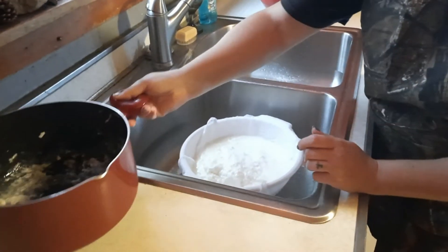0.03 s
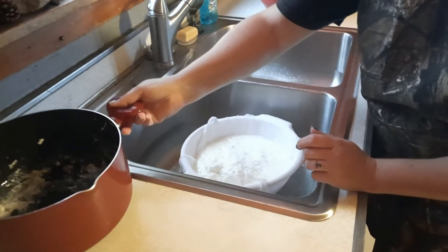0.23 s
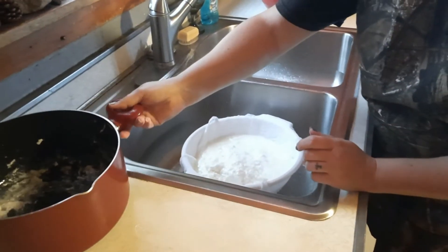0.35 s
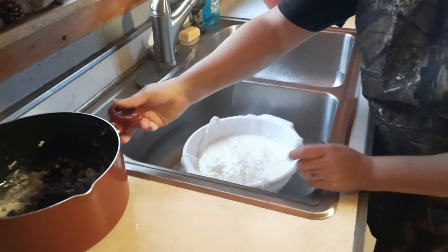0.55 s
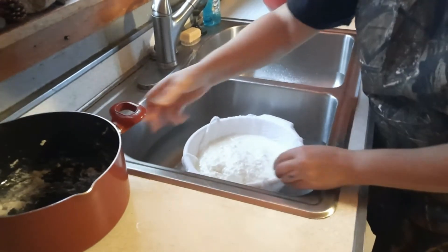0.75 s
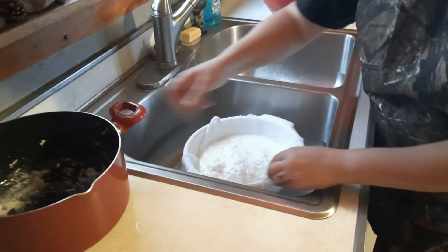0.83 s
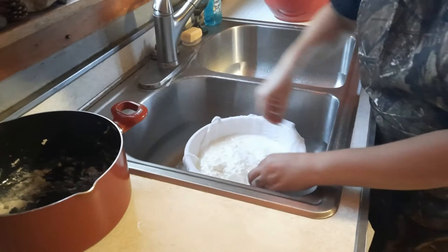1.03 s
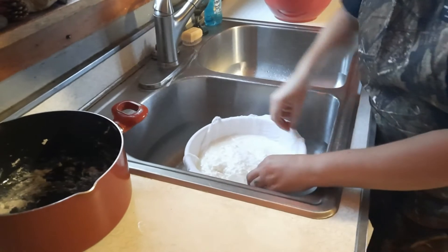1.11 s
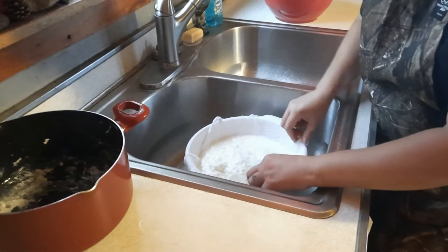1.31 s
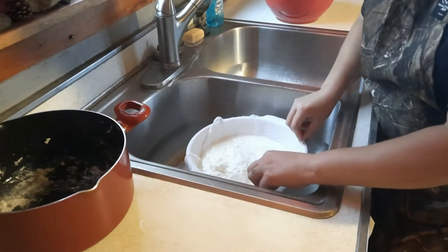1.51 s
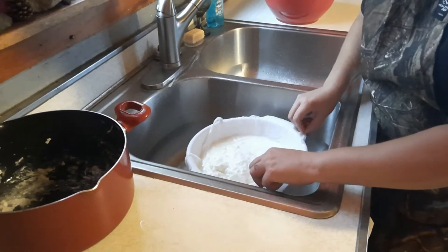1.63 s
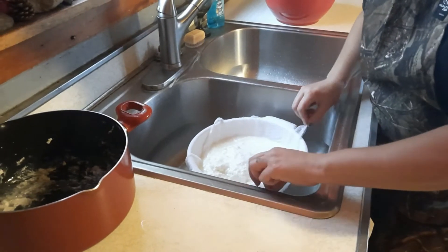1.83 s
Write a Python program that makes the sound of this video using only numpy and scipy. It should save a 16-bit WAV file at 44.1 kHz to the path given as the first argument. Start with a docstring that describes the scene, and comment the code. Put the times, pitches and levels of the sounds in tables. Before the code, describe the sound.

Close stereo pickup in a small kitchen: faint finger ticks, one loud pot clunk with clatter, smaller knocks as it settles, then soft plops in a steel sink and light handling over a low refrigerator hum.

```python
"""A small kitchen, beside a steel sink: a heavy enamelled pot lands on the counter, then rocks and settles.
The pot is sums of dying modes with shaped noise for crack and clatter; the sink rim answers with low modes.
Whey drips from a colander of curds as gliding sines with splats of noise.
Fingers tick and rub on handle and rim as resonant noise; a refrigerator hums in harmonics over noise.
The recorder's gain ducks after the loud sound and creeps back."""
import sys
import numpy as np
from scipy import signal
from scipy.fft import rfft, irfft, next_fast_len
from scipy.io import wavfile
from scipy.ndimage import uniform_filter1d

SR = 44100
rng = np.random.default_rng(int(sys.argv[2]) if len(sys.argv) > 2 else 0)


def to_wav(sig):
    """Store sig (one row per channel, or 1-D mono) as 16-bit WAV at the path in sys.argv[1].

    Samples outside -1..1 are clipped; the rate is SR.
    """
    pcm = np.clip(np.atleast_2d(sig), -1, 1) * 32767
    pcm = np.round(pcm).astype(np.int16)
    wavfile.write(sys.argv[1], SR, pcm.T)  # frames by channels


N = 83790  # samples, 1.9 s


def amp(db):
    """Decibels to gain."""
    return 10 ** (np.asarray(db) / 20)


def unit(x):
    """Scale to rms 1."""
    return x / np.sqrt(np.mean(x ** 2) + 1e-20)


def along(points, hz):
    """Read a curve of (Hz, value) points on a log frequency axis."""
    f, v = np.transpose(points)
    return np.interp(np.log(hz + 1), np.log(f + 1), v)


def pan(side_db):
    """Left and right gains for a level difference, left minus right in dB."""
    return amp(np.array([[.5], [-.5]]) * side_db)


def since(s):
    """Seconds since a moment, zero before it."""
    return np.maximum(np.arange(N) / SR - s, 0)


def fade(t, t60):
    """Exponential decay that falls 60 dB in t60 seconds."""
    return np.exp(-np.log(1000) * t / t60)


def rise(t, attack_s):
    """Soft onset with an exponential time constant."""
    return 1 - np.exp(-t / attack_s)


def resonance(hz, pitch_hz, width_hz):
    """Bell-shaped gain of one damped resonance."""
    return 1 / (1 + (2 * (hz - pitch_hz) / width_hz) ** 2)


def filtered(x, response):
    """Apply a response of frequency to x through its spectrum."""
    m = next_fast_len(N + SR // 2)
    gain = response(np.fft.rfftfreq(m, 1 / SR))
    return irfft(rfft(x, m) * gain, m)[..., :N]


# How alike left and right noise are. Each row: frequency in Hz, likeness (1 is mono, 0 unrelated).
LIKENESS = [(60, 0.79), (200, 0.85), (550, 0.58), (1650, 0.21), (5000, 0.021)]


def noise(gain, side_db=np.zeros_like):
    """Stereo noise of rms 1 with a given colour and balance, its channels more alike in the bass."""
    def mid_side(hz):
        turn = np.arccos(np.clip(along(LIKENESS, hz), -1, 1)) / 2
        return np.array([np.cos(turn), np.sin(turn)])

    mid, side = filtered(rng.standard_normal((2, N)), mid_side)
    stereo = np.array([mid + side, mid - side])
    return unit(filtered(stereo, lambda hz: gain(hz) * pan(side_db(hz))))


def dying(x, start_s, t60s):
    """Let each frequency of x die at its own speed from the start on."""
    hz, t, z = signal.stft(x, SR, nperseg=256)
    decay = fade(np.maximum(t - start_s, 0), along(t60s, hz)[:, None])
    y = signal.istft(z * decay, SR, nperseg=256)[1]
    return y[:, :N] * rise(since(start_s), 0.00077)


# Reverberation of the small room. Each row: frequency in Hz, t60 in seconds.
ROOM_DECAY = [(200, 1), (2000, 0.23), (10000, 0.15)]


def kitchen(x):
    """The small room's answer: convolution with noise whose treble dies faster than its bass."""
    tail = dying(noise(np.ones_like), 0.0015, ROOM_DECAY)
    return signal.fftconvolve(x, tail / np.linalg.norm(tail[0]), axes=1)[:, :N]


def drift():
    """Slow random wander of rms 1, mostly below 2 Hz."""
    return unit(filtered(rng.standard_normal(N), lambda hz: 1 / (1 + (hz / 2) ** 4)))


# Refrigerator harmonics. Each row: multiple of the fundamental, level in dB rms.
FRIDGE_HARMONICS = [(1, -69), (5, -64), (6, -65.5), (8, -68), (10, -74.5), (15, -77.5)]
FRIDGE_HZ, HUM_WANDER_DB, HUM_WANDER_RAD = 59.6, 0.62, .5
AIR_SIDE_DB = -2  # left minus right, hum and room noise


def refrigerator():
    """The hum is a set of harmonics, each slightly unsteady in level and phase."""
    hum = 0
    for k, db in FRIDGE_HARMONICS:
        level = np.sqrt(2) * amp(db + HUM_WANDER_DB * drift())
        hum += level * np.sin(2 * np.pi * k * FRIDGE_HZ * since(0) + HUM_WANDER_RAD * drift())
    return hum * pan(AIR_SIDE_DB)


# Colour of the low room noise. Each row: frequency in Hz, level in dB per Hz.
AIR_COLOUR = [(25, -45), (60, -8), (200, -8), (320, 0), (520, -1), (680, -19.5), (950, -16), (3000, -41.5)]
# Swell of the room noise. Each row: time in seconds, level in dB.
AIR_SWELL = [(0, -59.5), (.2, -53.5), (.8, -59), (1.649, -59.5), (1.818, -57), (1.9, -59.5)]


def room_air():
    """Low coloured noise whose level swells and sinks."""
    level = amp(np.interp(since(0), *np.transpose(AIR_SWELL)))
    return level * noise(lambda hz: amp(along(AIR_COLOUR, hz))) * pan(AIR_SIDE_DB)


# Colour of the microphone hiss. Each row: frequency in Hz, level in dB per Hz.
HISS_COLOUR = [(1000, -9), (2000, -2), (2800, 8), (3450, -8.5), (4100, 6.5), (5000, -6), (6700, 7),
               (8500, -10.5), (15800, -13.5)]
# Balance of the hiss. Each row: frequency in Hz, left minus right in dB.
HISS_BALANCE = [(1600, 2), (5000, -9), (7000, -10.5), (9000, 4)]
HISS_DB = -68


def microphone_hiss():
    """Steady treble noise with its own colour and balance."""
    colour = lambda hz: amp(along(HISS_COLOUR, hz))
    return amp(HISS_DB) * noise(colour, lambda hz: along(HISS_BALANCE, hz))


# Drops of whey landing in the sink. Each row: start in seconds, level in dB, starting bubble pitch in Hz.
WHEY_DROPS = [(0.062, -57.5, 1290), (0.102, -58, 1295), (0.552, -51.5, 1190), (0.672, -49.5, 1229),
              (.977, -41.5, 1182), (1.007, -49.5, 1190), (1.131, -41.5, 1203), (1.160, -48.5, 1060),
              (1.229, -58, 1250), (1.411, -51, 1284)]
DRIP_ATTACK_S, DRIP_T60_S, DRIP_SIDE_DB = 0.0022, 0.044, 3
DRIP_GLIDE_PER_S = -7  # the pitch falls exponentially
SPLAT_DB, SPLAT_HZ, SPLAT_WIDTH_HZ, SPLAT_T60_S = -5.5, 1076, 400, 0.13  # level relative to its drop
BASIN_ECHO_S, BASIN_ECHO_DB, DRIP_ROOM_DB = 0.0058, -1.5, -10.5


def plop(s, db, hz):
    """A bubble's short sine, gliding down as it dies."""
    t = since(s)
    glide = np.exp(np.clip(DRIP_GLIDE_PER_S * t, -1, 1)) * (t > 0)
    phase = 2 * np.pi * hz * np.cumsum(glide) / SR
    return 2 * amp(db) * np.sin(phase) * rise(t, DRIP_ATTACK_S) * fade(t, DRIP_T60_S)


def drips():
    """Each drop plops and softly splats; the basin echoes the plop once, the room answers both."""
    plops, wetness = 0, 0
    for s, db, hz in WHEY_DROPS:
        t = since(s)
        plops += plop(s, db, hz) + plop(s + BASIN_ECHO_S, db + BASIN_ECHO_DB, hz)
        wetness += amp(db + SPLAT_DB) * rise(t, DRIP_ATTACK_S) * fade(t, SPLAT_T60_S)
    splats = wetness * noise(lambda hz: np.exp(-(2 * (hz - SPLAT_HZ) / SPLAT_WIDTH_HZ) ** 2 / 2))
    dry = pan(DRIP_SIDE_DB) * (plops + splats)
    return dry + amp(DRIP_ROOM_DB) * kitchen(dry)


# Fingers rubbing along handle and rim. Each row: start in seconds, length in seconds, level in dB,
# resonance in Hz, width of the resonance in Hz.
FINGER_RUBS = [(0.06, 0.055, -61, 2880, 250), (1.53, 0.12, -58.5, 1900, 1100),
               (1.58, 0.13, -72.5, 3370, 299), (1.797, 0.061, -70, 2820, 300)]
GRIP_TOP_HZ, GRIP_SWING_DB = 180, 2.5  # fastest change of grip, its rms swing
HANDS_SIDE_DB = -3  # left minus right


def rubs():
    """Fingers slide with an uneven grip and excite one resonance of the handle or the plastic."""
    dry = np.zeros((2, N))
    for s, length_s, db, pitch_hz, width_hz in FINGER_RUBS:
        stroke = np.sqrt(np.abs(np.sin(np.pi * np.minimum(since(s) / length_s, 1))))
        grip = unit(filtered(rng.standard_normal(N), lambda hz: hz < GRIP_TOP_HZ))
        body = noise(lambda hz: resonance(hz, pitch_hz, width_hz))
        dry += amp(db) * stroke * unit(amp(GRIP_SWING_DB * grip) * body)
    return dry * pan(HANDS_SIDE_DB)


# Fingers ticking on pot handle and colander. Each row: start in seconds, level in dB, resonance in Hz,
# width of the resonance in Hz, broadband snap in dB relative to the resonance.
FINGER_TICKS = [(.014, -55, 2793, 255, 2.5), (0.185, -48.5, 2820, 160, -0.5), (0.881, -48, 2586, 470, -2),
                (.883, -55.5, 1210, 166, 1.5), (.937, -64, 1220, 200, 12), (1.055, -66, 2070, 401, 5),
                (1.292, -55, 1790, 250, -24), (1.3, -54.5, 2860, 208, -18), (1.412, -46, 1620, 337, -35),
                (1.412, -53.5, 2750, 303, -10), (1.477, -54, 2800, 445, -9), (1.573, -47, 3290, 248.5, -10),
                (1.882, -59.5, 2810, 250, -2)]
# Colour of the snap. Each row: frequency in Hz, level in dB per Hz.
SNAP_COLOUR = [(200, 7), (1200, 0), (1800, -8), (4500, 2), (6500, -2.5), (8500, -10.5), (15000, -23)]
TICK_T60_S, SNAP_T60_S, TICK_ROOM_DB = 0.083, 0.055, -1.5


def ticks():
    """Each touch is a light snap and one damped resonance, answered by the room."""
    dry = np.zeros((2, N))
    for s, db, pitch_hz, width_hz, snap_db in FINGER_TICKS:
        t = since(s)
        body = noise(lambda hz: resonance(hz, pitch_hz, width_hz)) * fade(t, TICK_T60_S)
        snap = noise(lambda hz: amp(along(SNAP_COLOUR, hz))) * fade(t, SNAP_T60_S)
        dry += amp(db) * rise(t, 0.00035) * (body + amp(snap_db) * snap) * pan(HANDS_SIDE_DB)
    return dry + amp(TICK_ROOM_DB) * kitchen(dry)


# Modes of the sink rim. Each row: frequency in Hz, level in dB, t60 in seconds.
RIM_MODES = [(73, -25.5, .12), (143, -22, 0.14), (276.6, -28, 0.3), (419.6, -34.5, 0.44), (534, -36, 0.52),
             (892, -26.5, 0.054)]
RIM_KNOCK_S = .4155
THUD_ATTACK_S, THUD_SIDE_DB = .001, 3  # shared by rim and counter


def rim():
    """The rocking pot knocks the steel rim of the sink, which answers with a few low modes."""
    t = since(RIM_KNOCK_S)
    ring = sum(amp(db) * fade(t, t60) * np.sin(2 * np.pi * hz * t) for hz, db, t60 in RIM_MODES)
    return ring * rise(t, THUD_ATTACK_S) * pan(THUD_SIDE_DB)


# Modes of the counter under the pot. Each row: frequency in Hz, level in dB, undamped t60 in seconds.
COUNTER_MODES = [(68.4, -9.5, 0.26), (145.5, -1.5, 0.97), (198.9, -18.5, 0.45), (303, -5.5, 0.39),
                 (414.2, -1.5, 0.38), (550.5, -17, 0.9), (584, -22.5, 0.22), (725, -19.5, 0.21)]
PUSH_HZ, PUSH_DB, PUSH_T60_S = 390, 15, .017


def counter_thud(t, soft):
    """A short dead push and the counter's modes, duller for a softer contact."""
    push = -amp(PUSH_DB) * soft(PUSH_HZ) * fade(t, PUSH_T60_S) * np.sin(2 * np.pi * PUSH_HZ * t)
    modes = sum(amp(db) * soft(hz) * fade(t, t60) * np.cos(2 * np.pi * hz * t)
                for hz, db, t60 in COUNTER_MODES)
    return (push + modes) * rise(t, THUD_ATTACK_S) * pan(THUD_SIDE_DB)


# Modes of the pot wall; the close pair beats slowly. Each row: frequency in Hz, level in dB,
# undamped t60 in seconds, left minus right in dB.
WALL_MODES = [(1026, -7, 0.3, -7), (1166, -1, 0.52, 0), (1185, 4, 0.54, 1), (1444, -6, 0.27, 3),
              (1744, 9, 0.33, -3), (2055, -5.5, .38, -7), (2347, 0, 0.38, 2), (2702, -10, 0.42, 8),
              (3101, -9, 0.3, -9), (3585, -7.5, 0.35, 0), (4893, -12, 0.22, 8)]
RING_ATTACK_S, RING_LAG_RAD = .011, 0.8  # the lag is the phase between left and right


def wall_ring(t):
    """The pot wall rings in its modes, with left and right out of phase."""
    lag = RING_LAG_RAD * np.array([[.5], [-.5]])
    modes = sum(amp(db) * pan(side) * fade(t, t60) * np.sin(2 * np.pi * hz * t + lag)
                for hz, db, t60, side in WALL_MODES)
    return modes * rise(t, RING_ATTACK_S)


# The pot meets the counter. Each row: start in seconds, counter thud in dB, pot ring in dB, clatter in dB,
# crack in dB, hardness as corner frequency in Hz, seconds until the seated base damps the ring.
POT_CONTACTS = [(0.2217, -14.5, -26, -17.5, -15.5, 17400, 0.2),
                (0.2772, -19.5, -29, -37, -24.5, 487, 0.014), (0.4109, -41.5, -62, -40, -31, 5070, 0.062),
                (0.4151, -27, -64, -33.5, -26, 917, 0.02), (.586, -30.5, -75.5, -54.5, -42.5, 132, 0.087)]
# Dense upper modes of pot, counter and sink. Each row: frequency in Hz, level in dB per Hz.
CLATTER_COLOUR = [(40, -27), (110, -8.5), (300, 2), (450, 2), (750, -7.5), (1100, -7.5), (1600, -21),
                  (3000, -18.5), (4000, -23.5), (6200, -20.5), (8500, -32), (12000, -31), (15500, -43.5)]
# How long the clatter rings. Each row: frequency in Hz, t60 in seconds.
CLATTER_DECAY = [(60, 0.54), (300, 0.76), (700, 0.41), (1500, 0.63), (5000, 0.51), (14000, 0.38)]
# Colour of the crack. Each row: frequency in Hz, level in dB per Hz.
CRACK_COLOUR = [(100, -24), (400, -3.5), (1500, 1), (3500, -2.5), (6200, -1.5), (8500, -12), (15500, -18)]
# Balance of crack and clatter. Each row: frequency in Hz, left minus right in dB.
POT_BALANCE = [(60, -1), (950, 3), (1900, -0.5), (3800, -3.5), (6500, -8.5), (9000, 3.5)]
POT_SEAT_STRETCH = 0.97  # the wall's time to damp, as a share of the counter's
CRACK_T60_S, CRACK_ATTACK_S, CLATTER_RISE_S = 0.056, 0.00043, 0.018
MODE_SPACING_HZ, MODE_DEPTH_DB = 21.93, 5.5  # many close, uneven modes; depth fades towards the bass


def pot():
    """Each contact thumps the counter, rings the pot wall and sets off a crack and a dense clatter."""
    out = np.zeros((2, N))
    mode_db = MODE_DEPTH_DB * np.clip(rng.standard_normal(size=4096), -2, 2)

    def uneven(hz):
        return np.interp(hz / MODE_SPACING_HZ, np.arange(len(mode_db)), mode_db) * hz / (hz + 1000)

    for s, thud_db, ring_db, clatter_db, crack_db, top_hz, seat_s in POT_CONTACTS:
        t = since(s)
        soft = lambda hz: 1 / np.sqrt(1 + (hz / top_hz) ** 4)
        seated = lambda after_s: np.exp(-(t / after_s) ** 4)

        def coloured(spectrum):
            gain = lambda hz: amp(along(spectrum, hz) + uneven(hz)) * soft(hz)
            return noise(gain, lambda hz: along(POT_BALANCE, hz))

        clatter = dying(coloured(CLATTER_COLOUR), s, CLATTER_DECAY) * rise(t, CLATTER_RISE_S)
        crack = coloured(CRACK_COLOUR) * fade(t, CRACK_T60_S) * rise(t, CRACK_ATTACK_S)
        out += amp(thud_db) * counter_thud(t, soft) * seated(seat_s)
        out += amp(ring_db) * wall_ring(t) * seated(POT_SEAT_STRETCH * seat_s)
        out += amp(clatter_db) * clatter + amp(crack_db) * crack
    return out


def scene():
    """Everything at the sink, from the background to the pot."""
    background = refrigerator() + room_air() + microphone_hiss()
    hands = rubs() + ticks()
    return background + drips() + hands + rim() + pot()


DUCK_ABOVE_DB, DUCK_MOST_DB, DUCK_ATTACK_S, RECOVER_DB_PER_S = -50, 7.5, 0.36, 10
LOW_CUT_HZ, TOP_HZ = 88, 15800


def record(dry):
    """Gain control ducks after loud sound and recovers steadily; then the low cut and the band limit."""
    power = uniform_filter1d(np.mean(dry ** 2, axis=0), size=256)
    level_db = 10 * np.log10(np.abs(power) + 1e-12)
    wanted_db = np.clip(level_db - DUCK_ABOVE_DB, 0, DUCK_MOST_DB)
    # hold the deepest duck so far, released at a steady rate
    back_db = RECOVER_DB_PER_S * since(0)
    duck_db = np.maximum.accumulate(wanted_db + back_db) - back_db
    # the gain follows with a one-pole lag
    step = 1 / (DUCK_ATTACK_S * SR)
    out = dry * amp(-signal.lfilter([step], [1, step - 1], duck_db))
    out = signal.sosfilt(signal.butter(2, LOW_CUT_HZ, 'highpass', fs=SR, output='sos'), out)
    return filtered(np.clip(out, -1, 1), lambda hz: hz < TOP_HZ)


dry = scene()
out = record(dry)
to_wav(out)
```